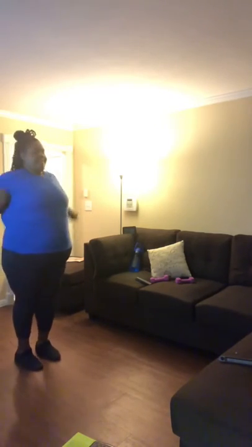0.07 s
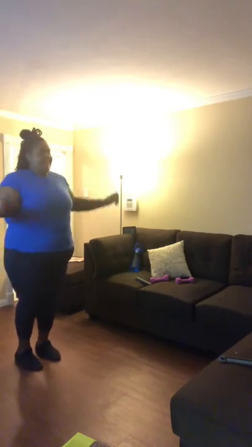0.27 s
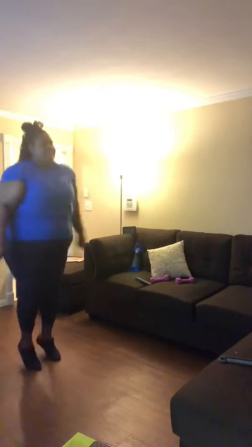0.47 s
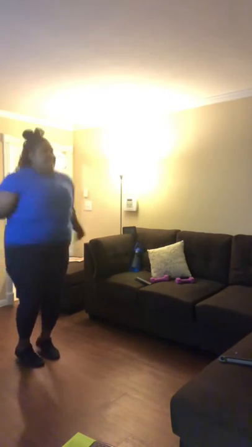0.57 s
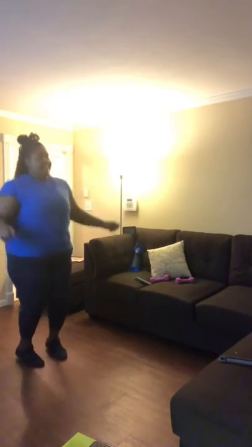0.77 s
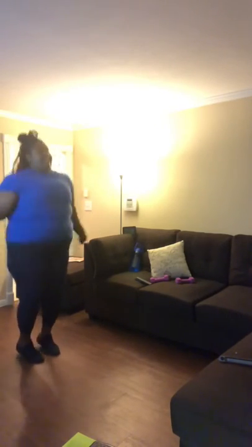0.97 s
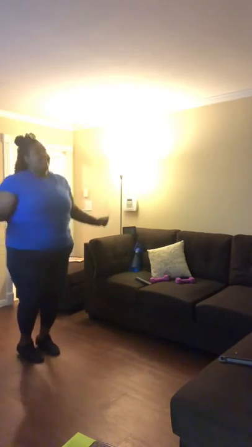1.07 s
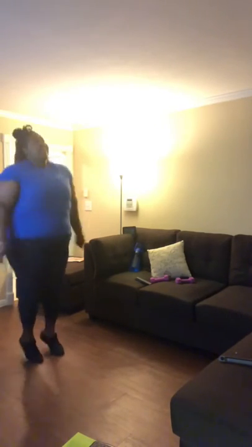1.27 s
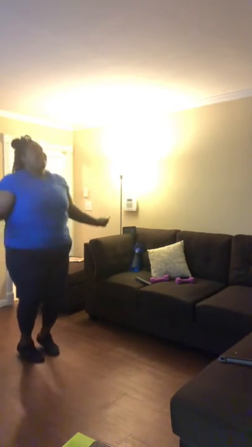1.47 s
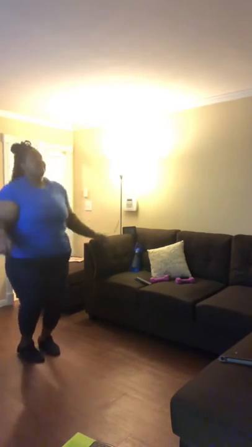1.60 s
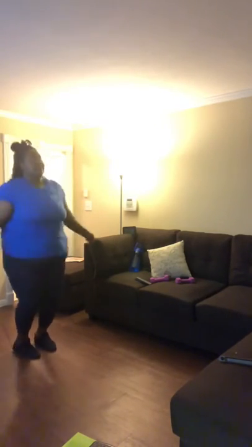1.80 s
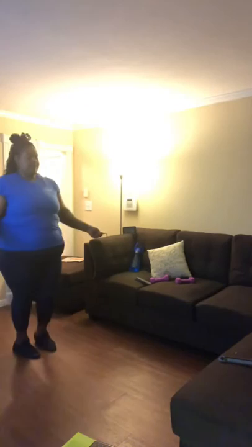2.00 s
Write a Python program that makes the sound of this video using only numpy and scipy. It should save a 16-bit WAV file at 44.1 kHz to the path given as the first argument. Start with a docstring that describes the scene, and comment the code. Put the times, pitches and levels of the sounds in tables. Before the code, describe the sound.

Skipping rope slapping wooden boards in a steady rhythm, with soft shoe landings in a living room

```python
"""A skipping rope cracks on a hardwood floor in a small living room, and shoes land just after it.
Each crack is a very short burst of noise heard with its room echoes. A shoe adds a clap, ringing boards
and a thud. Scuffs are softer noise bursts, and rope and clothes swish as grainy noise.
Underneath are steady room air, a low hum and a faint drone that rises in pitch."""
import sys
import numpy as np
from scipy import signal
from scipy.fft import rfft, irfft, next_fast_len
from scipy.io import wavfile
from scipy.ndimage import map_coordinates

SR = 44100
rng = np.random.default_rng(int(sys.argv[2]) if len(sys.argv) > 2 else 0)


def pcm_store(signal):
    """Save signal as 16-bit PCM."""
    levels = np.round(np.clip(np.atleast_2d(signal), -1, 1) * 32767)
    wavfile.write(sys.argv[1], SR, levels.astype(np.int16).T)


N = 90184  # length in samples

# Hits of the cord on the boards: t/s, level/dB, centre of the bright hump f/Hz,
# contact length t/s, direct crack compared with the room echoes level/dB
CORD_HITS = [(0.5450, -10, 10950, 0.0001, -12), (0.9660, 0.1, 8450, 0.00059, 0.5),
             (1.3654, -1.5, 6800, 0.00045, -4), (1.3751, -3.5, 5500, 0.000028, -2.5),
             (1.3827, -9.5, 4200, 0.0013, -6), (1.7682, -3, 10500, 0.00014, -1)]
# Basic tone of the cord, relative: f/Hz, level/dB
CORD_TONE = [(100, -53), (900, -16.5), (1500, -21.5), (2200, -11), (4500, -4.5), (9000, -4), (12000, -5.5),
             (15000, -5.5), (16000, -3)]
CORD_HUMP_DB, CORD_HUMP_OCTAVES = 7, 0.81  # height and width of the bright hump


def rope():
    """The cord whips the boards: a very short contact gives a bright crack."""
    out = np.zeros(N)
    for start, db, bright_hz, length, direct_db in CORD_HITS:
        def colour(f):
            return amp(along(CORD_TONE, f) + CORD_HUMP_DB * hump(f, bright_hz, CORD_HUMP_OCTAVES))

        crack = signal.fftconvolve(room(direct_db), contact(length))
        add(out, start, amp(db) * coloured(crack, colour))
    return out


# Shoe contacts: t/s, clap level/dB, treble falls above f/Hz, board ring compared with the clap level/dB,
# crispness left in the treble level/dB, centre of the clap's tone f/Hz
SHOE_HITS = [(.619, -8, 2500, -1, -16, 1420), (.6277, -12, 5630, -27, -8, 4100),
             (.8175, -20, 5760, -12, -5, 2200), (1.0205, -12.5, 2250, -1.5, -10, 1090),
             (1.2295, -19, 2570, -11, -6, 1720), (1.416, -8.5, 2380, -3, -10, 1730),
             (1.582, -29.5, 5100, 0, 5, 2450), (1.622, -25.5, 2070, -6, -13, 890),
             (1.7967, -9, 6000, -2, -6, 2650), (1.817, -14.5, 2100, -13, -9, 830),
             (2.002, -30.5, 4450, -9, 10, 2510)]
# Basic tone of the sole, relative: f/Hz, level/dB
SOLE_TONE = [(60, -64), (200, -0.5), (500, -1.5), (680, 1), (1200, 2), (1900, 2.5), (3000, 6), (6000, 1),
             (16000, -9)]
# Notes of the floorboards, levels relative: f/Hz, level/dB, time to fall 60 dB t/s
BOARD_NOTES = [(666, -8.5, 0.49), (747.6, 6, 0.11), (912, 1.5, 0.23), (982, -4.5, 0.14), (1129, -14, 0.12),
               (1435, -6.5, 0.12), (1507, -17, 0.12), (1760, 0, 0.13), (1892, -1.5, 0.2), (2099, 3, 0.11),
               (2275, -2, 0.21), (2720, 3, 0.19), (3000, -0.5, 0.17), (3150, -6, 0.32)]
# Tone of the thud, relative: f/Hz, level/dB
THUD_TONE = [(30, -21), (60, -29), (90, 2), (125, 7.5), (200, 2.5), (400, -0.5), (1000, -59), (4000, -89)]
BASS_CUT_SHARE = 0.21  # bass fades below this share of the frequency where the treble falls
CLAP_DB, CLAP_OCTAVES = 4, 0.36  # air squeezed from under the sole colours the clap
SOLE_DIRECT_DB, DIRECT_DB_PER_OCTAVE, SOFT_SOLE_HZ = -13, 7.5, 2300
RING_SCATTER_DB, RING_ATTACK_S = 1.5, 0.0007
THUD_DB, THUD_RISE_S, THUD_T60_S = -19, 0.0095, 0.79  # level compared with the clap


def shoes():
    """Each sole claps and rings the boards as the weight thuds; a softer contact is duller."""
    out = np.zeros(N)
    t = np.arange(SR // 2) / SR
    for start, db, dull_hz, ring_db, edge_db, clap_hz in SHOE_HITS:
        def blow(f):
            treble = np.hypot(1 / np.hypot(1, (f / dull_hz) ** 4), amp(edge_db))
            bass_cut = f ** 2 / np.hypot(f ** 2, (BASS_CUT_SHARE * dull_hz) ** 2)
            return treble * bass_cut * amp(CLAP_DB * hump(f, clap_hz, CLAP_OCTAVES))

        # a harder contact has a stronger direct click
        direct_db = SOLE_DIRECT_DB + DIRECT_DB_PER_OCTAVE * np.log2(dull_hz / SOFT_SOLE_HZ)
        clap = coloured(room(direct_db), lambda f: amp(along(SOLE_TONE, f)) * blow(f))
        add(out, start, amp(db) * clap)

        ring = np.zeros(len(t))
        for hz, note_db, t60 in BOARD_NOTES:
            fade = amp(note_db + rng.normal(0, RING_SCATTER_DB) - 60 * t / t60)
            ring += blow(hz) * fade * np.sin(2 * np.pi * (hz * t + rng.random()))
        ring *= 1 - np.exp(-t / RING_ATTACK_S)
        add(out, start, amp(db + ring_db) * ring / np.linalg.norm(ring))

        # the body's weight swells into the floor, then dies away
        push = rng.standard_normal(len(t))
        push = push * (1 - np.exp(-t / THUD_RISE_S)) * amp(-60 * t / THUD_T60_S)
        thud = coloured(push / np.linalg.norm(push), lambda f: amp(along(THUD_TONE, f)))
        add(out, start, amp(db + THUD_DB) * thud)
    return out


# Soft scuffs on the floor: t/s, level/dB, contact length t/s, treble tilt in dB per octave
SCUFF_HITS = [(0.3393, -10, 0.006, 1.76), (0.356, -19.5, 0.012, -2), (0.661, -18, 0.014, 7),
              (0.827, -37, 0.01, 14), (1.168, -19, 0.026, 2), (1.665, -33, 0.0052, 9),
              (1.712, -25, 0.0045, 4.5), (1.738, -22, 0.026, 12.5)]
# Basic tone of a scuff before its tilt, relative: f/Hz, level/dB
SCUFF_TONE = [(50, -67), (235, -25), (285, 7), (345, -2), (390, 10), (440, 2.5), (590, 5.5), (730, -1.5),
              (2050, -4.5), (2300, -1.5), (2800, -7), (6500, -7.5), (10000, -18.5), (16000, -26.5)]


def scuffs():
    """Brief sliding contacts: scattered noise bursts with only a weak direct sound."""
    out = np.zeros(N)
    for start, db, length, tilt_db in SCUFF_HITS:
        def colour(f):
            return amp(along(SCUFF_TONE, f) + tilt_db * np.log2(f + 1))

        scrape = signal.fftconvolve(room(direct_db=-18.5), contact(length))
        add(out, start, amp(db) * coloured(scrape, colour))
    return out


# Loudness of the swish before its flutter: t/s, level/dB
SWISH_LEVEL = [(.33, -101), (.42, -74), (.49, -62), (.6, -66), (.71, -55), (.81, -61.5), (.85, -50.5),
               (.89, -60.5), (.94, -55), (1.1, -56), (1.2, -59.5), (1.28, -65.5), (1.34, -56), (1.54, -66),
               (1.69, -65), (1.76, -53.5), (1.92, -62), (2.04, -59.5)]
# Tone of the rustling, relative level per Hz: f/Hz, level/dB
CLOTH_TONE = [(200, -43), (900, -4), (2500, -1.5), (4500, -5), (7500, -5.5), (11000, -10.5), (16000, -20)]
GRAIN_DB, GRAINS_PER_S = 2.5, 500  # depth and rate of the fine grain
FLUTTER_DB = 1.1


def swish():
    """Rope and clothes rustle: noise broken into fine grains rises from near silence and flutters."""
    level_db, = curves(SWISH_LEVEL)
    grain_gain = amp(GRAIN_DB * wobble(GRAINS_PER_S))
    grains = unit(grain_gain * noise(CLOTH_TONE))
    return amp(level_db + FLUTTER_DB * wobble(60.84)) * grains


# Tone of the room air, relative level per Hz: f/Hz, level/dB
AIR_TONE = [(25, -58), (55, -25), (70, -20), (90, -16), (125, -18.5), (175, -1.5), (240, -5.5), (380, -2),
            (480, -2.5), (650, -4), (750, 4), (860, -3.5), (1100, -9), (1600, -15.5), (3000, -20.5),
            (7000, -28), (16000, -31.5)]
# Steady hum notes, average (rms) level before wavering: f/Hz, level/dB
HUM_NOTES = [(124, -77), (382, -70.5)]
# Changing rms level of the 152.5 Hz hum note before wavering: t/s, level/dB
LOW_HUM_LEVEL = [(0, -76.5), (.5, -66), (.9, -69.5), (2.04, -72.5)]
# Rising drone, rms level before wavering: t/s, f/Hz, level/dB
DRONE_PATH = [(0, 254.2, -89), (.7, 268.5, -71), (1, 292, -70), (1.25, 299.9, -61.5), (1.6, 304.8, -66),
              (2.04, 315, -65.5)]
AIR_DB, LOW_HUM_HZ = -59, 152.5
WAVER_DB, HUM_DRIFT_RAD = 0.7, 0.25  # gentle changes in loudness and in phase


def background():
    """Room air is steady noise; wavering sine waves make a hum and a drone that creeps up in pitch."""
    t = np.arange(N) / SR
    low_db, = curves(LOW_HUM_LEVEL)
    hum = np.zeros(N)
    for hz, db in [*HUM_NOTES, (LOW_HUM_HZ, low_db)]:
        loudness = amp(db + WAVER_DB * wobble(2.85))
        hum += loudness * np.sin(2 * np.pi * hz * t + HUM_DRIFT_RAD * wobble(6.6))
    drone_hz, drone_db = curves(DRONE_PATH)
    drone_phase = 2 * np.pi * np.cumsum(drone_hz) / SR
    drone = amp(drone_db + WAVER_DB * wobble(8.5)) * np.sin(drone_phase)
    # a sine's peak is sqrt(2) times its rms level
    return amp(AIR_DB) * noise(AIR_TONE) + np.sqrt(2) * (hum + drone)


# Fading of the room echoes: f/Hz, time to fall 60 dB t/s
ROOM_FADE = [(200, 0.27), (900, 0.3), (2500, 0.28), (7000, 0.26), (15000, 0.26)]
# Nearest surfaces: echo delay t/s, gain (plain factor)
NEAR_ECHOES = [(.0021, 0.25), (.0083, 0.14)]
EARLY_T60_S, EARLY_DB, BUILD_S = 0.13, 5.5, 0.00095  # dense first reflections die sooner than the room
EARLY_SPIKINESS = 0.45


def room(direct_db):
    """A click as it arrives: direct sound, nearest surfaces, uneven early echoes, then a diffuse tail."""
    hz, t, z = signal.stft(rng.standard_normal(SR // 2), SR, nperseg=256)
    late_fade = amp(-60 * t / along(ROOM_FADE, hz)[:, None])
    early_fade = amp(EARLY_DB - 60 * t / EARLY_T60_S)
    tail = signal.istft(z * np.hypot(late_fade, early_fade), SR, nperseg=256)[1]
    age = np.arange(len(tail)) / SR
    unevenness = np.exp(EARLY_SPIKINESS * wobble(3000)[:len(tail)] * np.exp(-age / 0.04))
    tail = tail * unevenness * (1 - np.exp(-age / BUILD_S))
    tail = tail / np.linalg.norm(tail)
    tail[0] += amp(direct_db)
    for delay, gain in NEAR_ECHOES:
        tail[round(delay * SR)] += gain
    return tail


def contact(length_s, size=4096):
    """A rough contact: the energy of one click, even in frequency, scattered over a short time."""
    t = np.arange(size) / SR
    z = rfft(rng.standard_normal(size) * np.exp(-(t / length_s) ** 2))
    burst = irfft(z / (np.abs(z) + 1e-12))[:size // 2]
    return burst / np.linalg.norm(burst)


def amp(db):
    """Turn dB into gain."""
    return 10 ** (np.asarray(db) / 20)


def unit(x):
    """Scale to rms 1."""
    return x / np.sqrt(np.mean(x ** 2) + 1e-20)


def along(points, hz):
    """Read (Hz, value) points on a log frequency axis."""
    f, v = np.transpose(points)
    return np.interp(np.log(hz + 1), np.log(f + 1), v)


def hump(hz, centre_hz, octaves):
    """A bell on the log frequency axis, about 1 at its centre."""
    return np.exp(-(np.log2((hz + 1) / centre_hz) / octaves) ** 2)


def curves(rows):
    """One value per sample for each column after the time."""
    s, *cols = np.transpose(rows)
    return [np.interp(np.arange(N) / SR, s, c) for c in cols]


def wobble(rate):
    """A smooth random curve through `rate` random points a second."""
    return map_coordinates(rng.standard_normal(int(N * rate / SR) + 4), [np.arange(N) * rate / SR])


def coloured(x, gain, size=2048):
    """Filter x with energy 1, shaped by gain(Hz); the filter never sounds ahead of its input."""
    cep = irfft(np.log(np.maximum(gain(np.fft.rfftfreq(size, 1 / SR)), 1e-6)))
    # folding the cepstrum forward puts the energy as early as possible (minimum phase)
    cep[1:size // 2] *= 2
    cep[size // 2 + 1:] = 0
    pulse = irfft(np.exp(rfft(cep)))
    return signal.fftconvolve(x, pulse / np.linalg.norm(pulse))[:len(x)]


def noise(spectrum):
    """Steady noise of rms 1 with the given spectrum."""
    size = next_fast_len(N + SR // 4)
    gain = amp(along(spectrum, np.fft.rfftfreq(size, 1 / SR)))
    return unit(irfft(rfft(rng.standard_normal(size)) * gain, size)[:N])


def add(track, s, sound):
    """Mix a sound into the track at time s."""
    part = track[max(0, round(s * SR)):][:len(sound)]
    part += sound[:len(part)]


def scene():
    """All sources mixed into one channel."""
    return (rope() + shoes() + scuffs() + swish() + background())[None]


TOP_HZ = 16000  # middle of the 400 Hz wide treble cutoff


def record(dry):
    """The recorder fades out the treble around its upper limit and keeps nothing beyond."""
    size = next_fast_len(N + SR // 4)
    keep = np.clip((TOP_HZ - np.fft.rfftfreq(size, 1 / SR)) / 400 + 0.5, 0, 1)
    return irfft(rfft(dry, size) * keep, size)[..., :N]


dry = scene()
out = record(dry)
pcm_store(out)
```